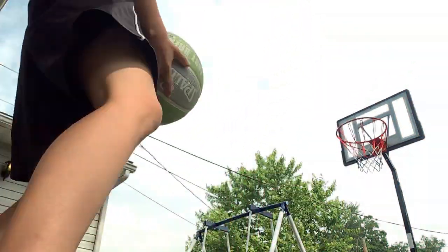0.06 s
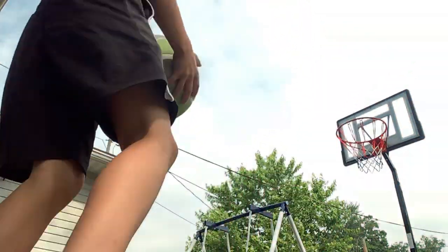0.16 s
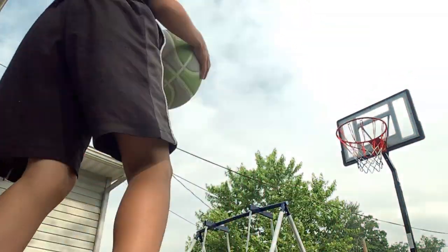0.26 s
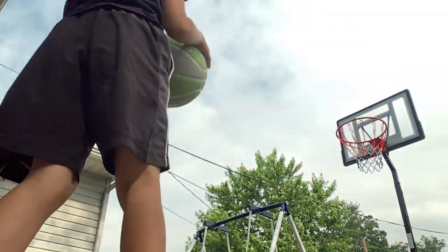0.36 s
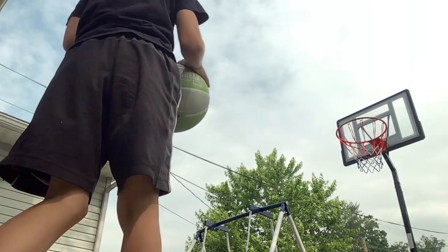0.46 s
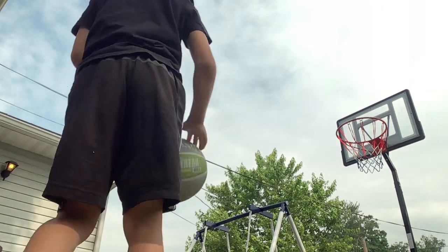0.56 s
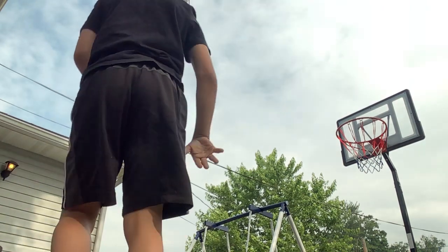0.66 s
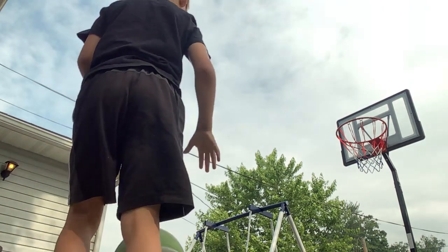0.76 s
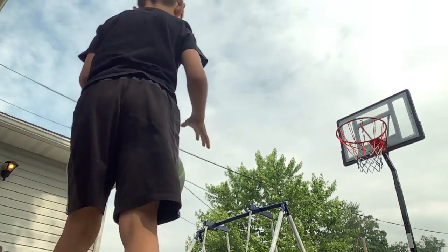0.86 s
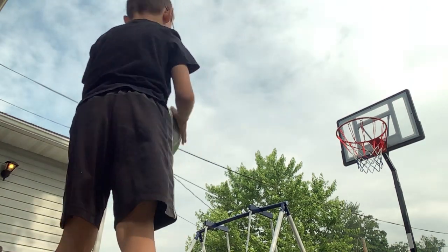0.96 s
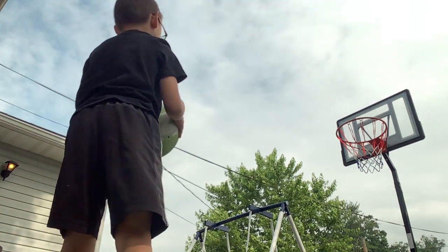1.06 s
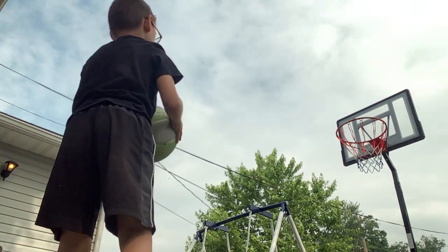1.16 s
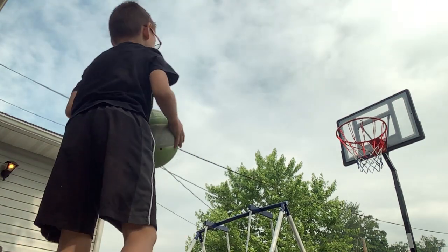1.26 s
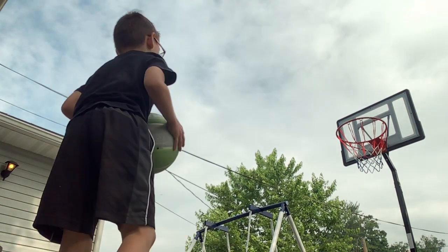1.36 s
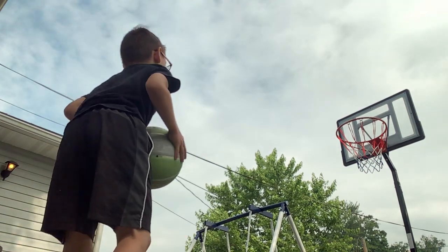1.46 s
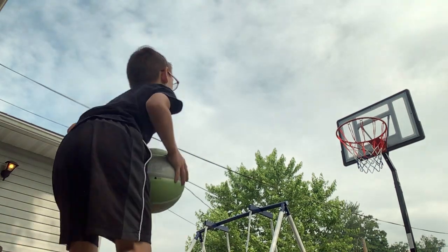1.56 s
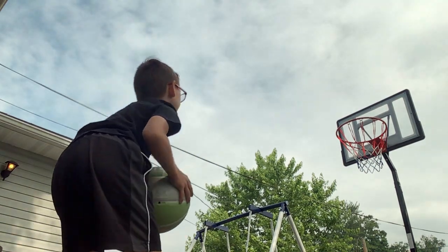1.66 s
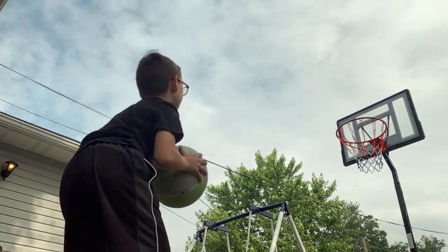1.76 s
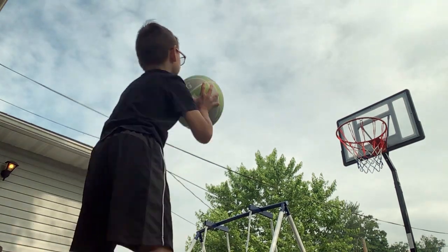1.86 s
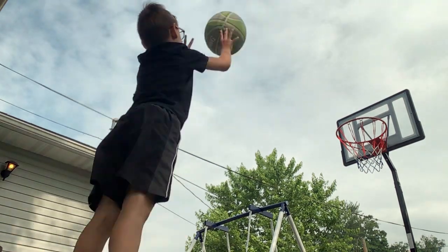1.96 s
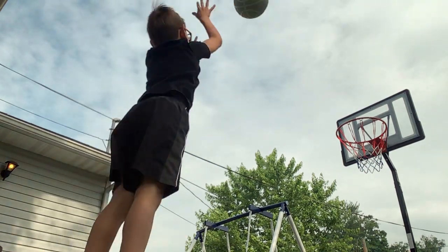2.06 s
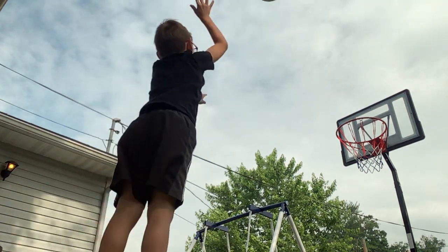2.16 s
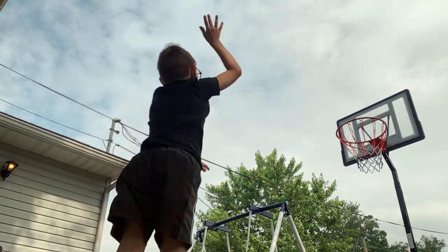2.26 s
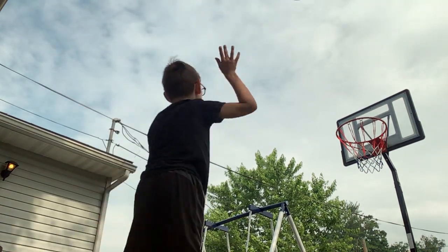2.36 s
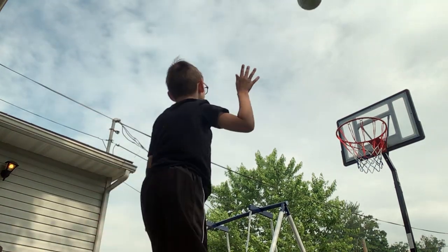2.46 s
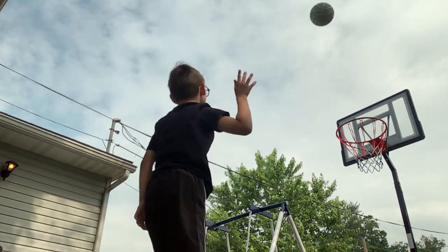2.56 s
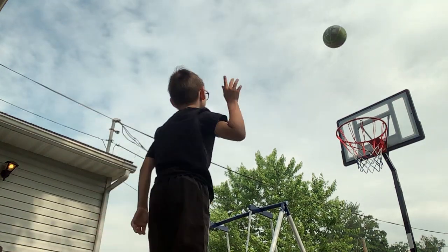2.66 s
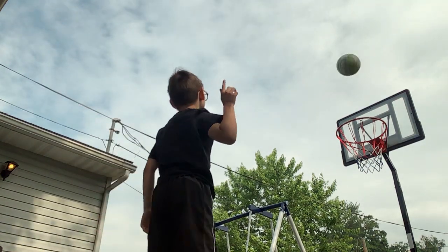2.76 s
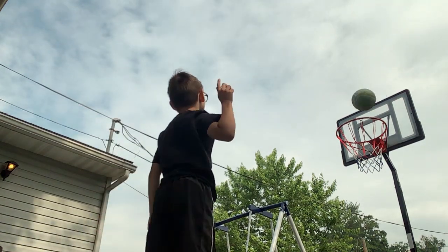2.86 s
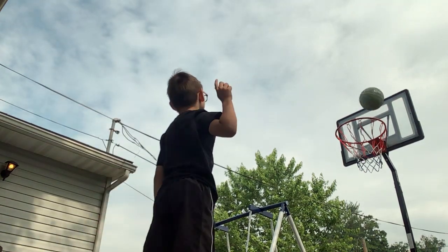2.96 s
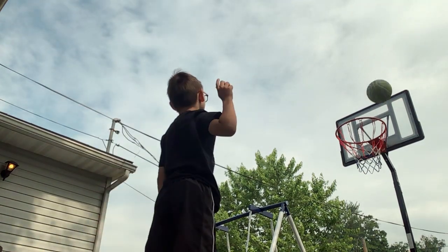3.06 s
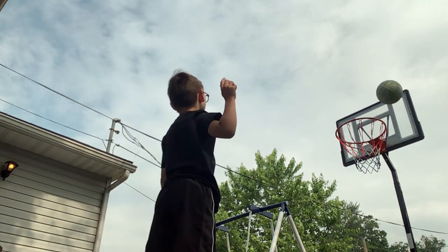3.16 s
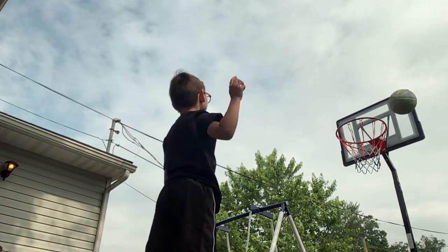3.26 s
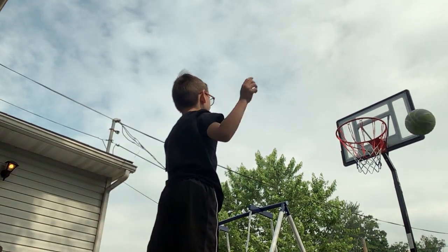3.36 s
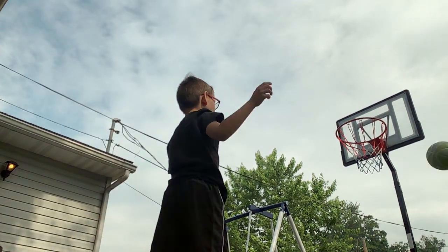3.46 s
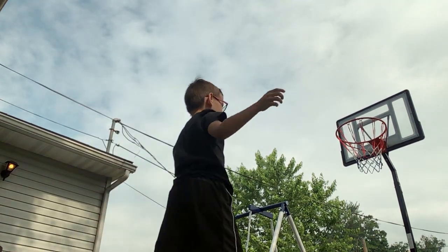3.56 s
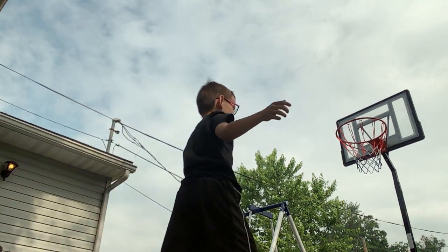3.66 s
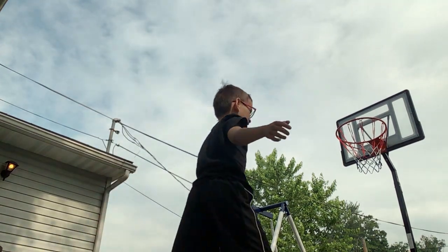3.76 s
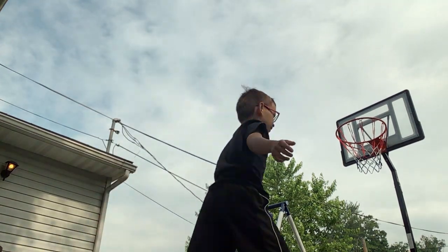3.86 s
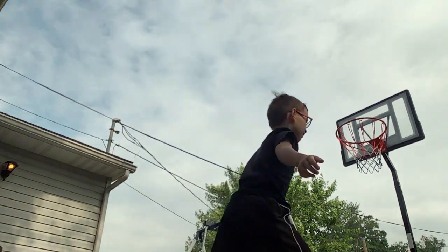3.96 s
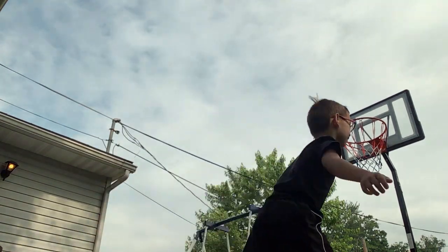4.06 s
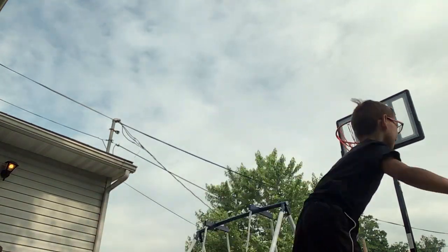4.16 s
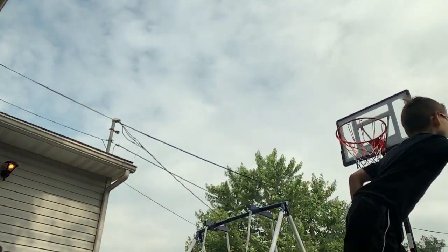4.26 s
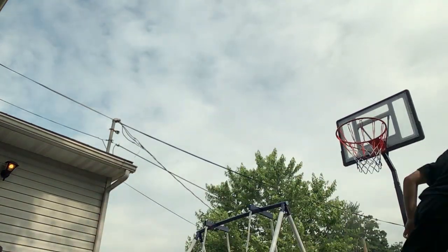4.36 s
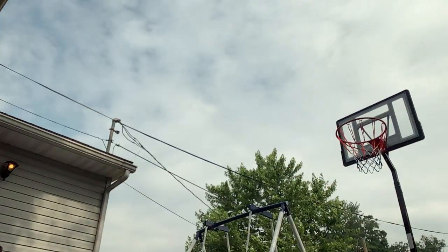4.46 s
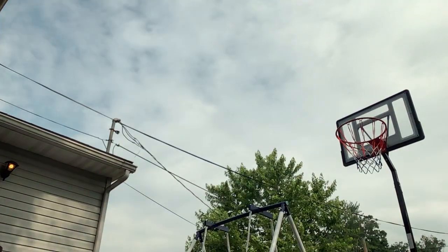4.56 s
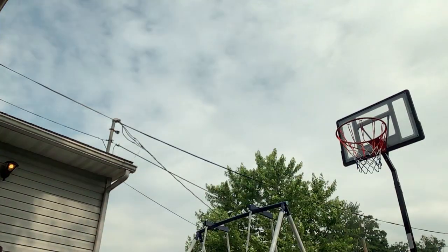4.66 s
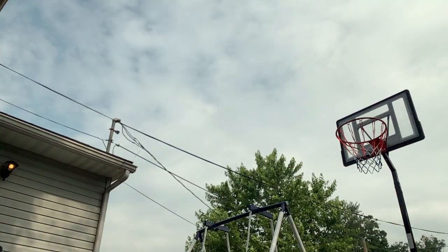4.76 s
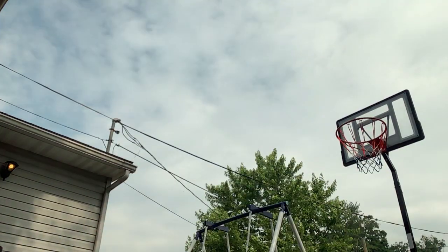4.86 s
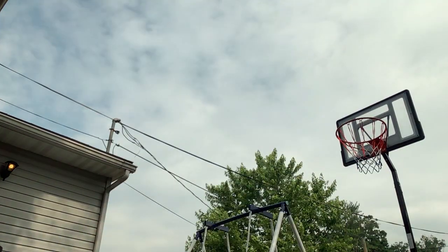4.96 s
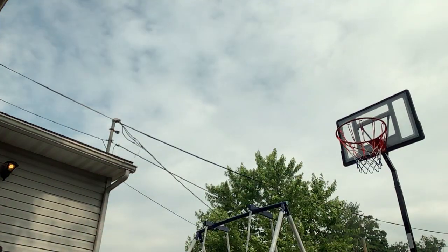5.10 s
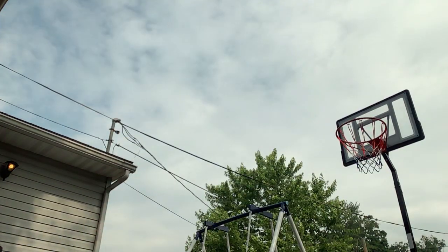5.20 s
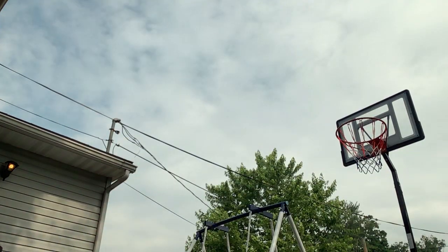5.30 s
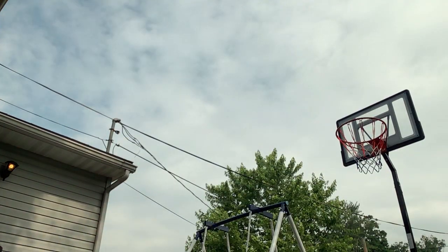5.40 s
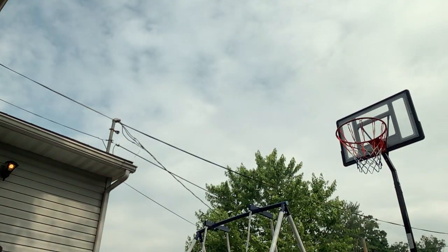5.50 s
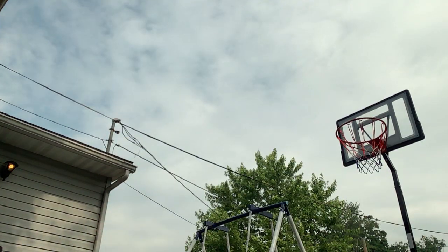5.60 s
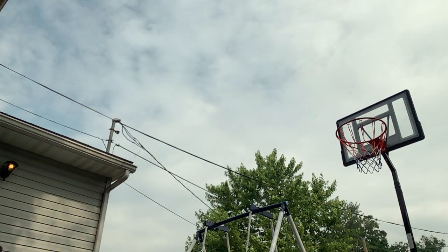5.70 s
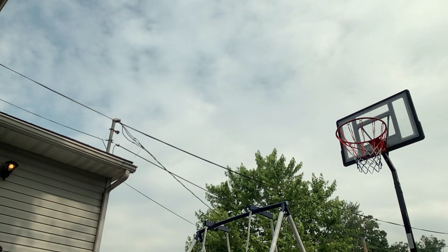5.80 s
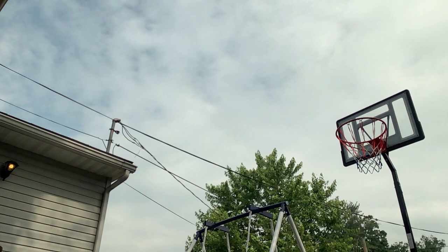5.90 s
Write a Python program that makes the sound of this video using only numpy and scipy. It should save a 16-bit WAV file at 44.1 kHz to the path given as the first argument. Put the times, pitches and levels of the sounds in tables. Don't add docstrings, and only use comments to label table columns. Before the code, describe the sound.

Outdoors, a ball is slapped and bounced with a hollow ring, clatters off a hoop's panel, and thumps away amid soft footsteps.

```python
import sys
import numpy as np
from scipy import signal
from scipy.fft import rfft, irfft
from scipy.io import wavfile
from scipy.ndimage import uniform_filter1d

SR = 44100
rng = np.random.default_rng(int(sys.argv[2]) if len(sys.argv) > 2 else 0)


def output_pcm(signal):
    pcm = np.clip(np.atleast_2d(signal).T, -1, 1) * 32767
    wavfile.write(sys.argv[1], SR, np.round(pcm).astype(np.int16))


def invert_db(x):
    u = np.asarray(x, float) / 20
    return 10 ** u


N = 261760
PAD = 2 ** 18
TIME, FREQ = np.arange(N) / SR, np.fft.rfftfreq(PAD, 1 / SR) + 1e-9
OCTAVE = np.log2(FREQ)


def unit(x):
    return x / np.sqrt(np.mean(x ** 2))


def shaped(x, gain):
    return irfft(rfft(x, PAD) * gain, PAD)[:N]


def band(hz, octaves):
    return np.exp(-2 * ((OCTAVE - np.log2(hz)) / octaves) ** 2)


def colour(points):
    hz, db = np.transpose(points)
    return invert_db(np.interp(np.log(FREQ), np.log(hz), db))


def walk(rate_hz):
    k = int(SR / rate_hz)
    held = np.repeat(rng.standard_normal(N // k + 1), k)
    slewed = uniform_filter1d(uniform_filter1d(held, k), k)
    return unit(slewed[:N])


def grainy(noise, depth_db, grain):
    jumps = np.repeat(rng.standard_normal(N // grain + 1), grain)[:N]
    return noise * invert_db(depth_db * jumps)


def swell(s, rise_ms, fall_ms, at=slice(None)):
    ms = (TIME[at] - s) * 1000
    exponent = np.where(ms < 0, -2 * (ms / rise_ms) ** 2, -ms / fall_ms)
    return np.exp(np.maximum(exponent, -40))


def bursts(noise, table, octaves, rise_ms=0, rise_share=0):
    out, size = np.zeros(N), PAD // 8
    for s, db, hz, fall_ms in table:
        start = int(np.clip(s * SR - size / 5, 0, N - size))
        at = slice(start, start + size)
        puff = unit(irfft(rfft(noise[at]) * band(hz, octaves)[::8], size))
        out[at] += invert_db(db) * puff * swell(s, rise_ms + rise_share * fall_ms, fall_ms, at)
    return out


def ring(x, hz, t60):
    pole = np.exp((2j * np.pi * hz - np.log(1000) / t60) / SR)
    return signal.lfilter([1], [1, -pole], x + 1e-18).imag


def thud(s, db, contact_ms, soft_ms):
    w, length = 2 * np.pi * FREQ, contact_ms / 1000
    squash = np.cos(w * length / 2) / (1 - (w * length / np.pi) ** 2 + 1e-9)
    centred = np.exp(-1j * w * (s + length / 2))
    softening = (1 + (w * soft_ms / 1000) ** 2) ** 1.57
    sound = irfft(-w ** 2 * squash * centred / softening, PAD)[:N]
    return invert_db(db) * sound / np.abs(sound).max()


def late(x, ms):
    return np.roll(x, int(ms * SR / 1000))


# t/s, push level/dB, contact/ms, softness/ms
BOUNCES = [
    (.7197, -10, 4.5, 1.8),
    (3.7669, -9.3, 6.5, 1.3),
    (4.7996, -16.3, 8, 1),
]
# delay/ms, level/dB
WALL_ECHOES = [
    [(26.4, -13), (36.4, -20), (49, -25), (57.4, -23), (81, -27)],
    [(24.8, -9), (47.8, -11), (74.7, -21), (128, -25)],
    [(19.7, -15), (28.7, -13), (36.5, -19), (53, -17), (92, -22), (101, -19)],
]
# ring level/dB, release over touch/dB, skin slap level/dB
HOLLOW = [
    (-13.5, 1.5, -11),
    (-29, 3, -26),
    (-41, 4, -29),
]
# f/Hz, level/dB, t60/s
BALL_MODES = [(447, -2, 0.047), (690, -25, 0.026), (900, -15, 0.049), (1014, -6.5, 0.082),
              (1168, 6.5, 0.032), (1366, 0, 0.03), (1650, -8, 0.034), (2050, -1, .03), (3000, -9, .03),
              (3950, -29, .03)]
YARD_T60_S, YARD_HZ, YARD_DB = 0.38, 500, -29.5


def ball():
    out = 0
    for (s, db, contact_ms, soft_ms), (ring_db, release_db, slap_db), echoes in zip(
            BOUNCES, HOLLOW, WALL_ECHOES):
        touch, release = s - soft_ms / 1000, s + (contact_ms + soft_ms) / 1000
        touch_kick = np.exp(-((TIME - touch) / 0.00015) ** 2)
        release_kick = np.exp(-((TIME - release + .001) / 0.00022) ** 2)
        kicks = touch_kick + invert_db(release_db) * release_kick
        hollow = sum(invert_db(mode_db) * ring(kicks, hz, t60) for hz, mode_db, t60 in BALL_MODES)
        hollow = invert_db(ring_db) * hollow / np.abs(hollow).max()
        skin = thud(touch - .0007, slap_db, contact_ms + 2 * soft_ms, 0.47)
        push = thud(s, db, contact_ms, soft_ms) + skin
        walls = sum(invert_db(echo_db) * late(push + 0.15 * hollow, ms) for ms, echo_db in echoes)
        yard_gain = band(100, 0.93) + invert_db(-24) * band(YARD_HZ, 2.45)
        diffuse = unit(shaped(rng.standard_normal(N), yard_gain))
        tail = diffuse * swell(s + 0.025, 45, 1000 * YARD_T60_S / np.log(1000))
        out = out + push + hollow + walls + invert_db(db + YARD_DB) * tail
    return out


# t/s, level/dB, contact/ms, softness/ms
ROCKING = [(2.9485, -20.5, 9, .5), (2.9585, -26, 3.5, .5), (2.9770, -23, 4.5, .7), (2.9866, -23, 5.5, 2),
           (2.9947, -19, 6, 1), (2.9999, -22, 12, 2), (3.0212, -18, 5, 1), (3.0277, -25, 6.5, 2),
           (3.0472, -21, 5, 1), (3.0575, -23, 7, 1.5)]
# t/s, level/dB, rattle/ms, tilt/(dB/octave)
BOARD_BLOWS = [
    (2.9268, -40, 21, 4.5),
    (2.9408, -30, 32.7, 5),
    (2.968, -37.5, 57, 2.5),
    (3.043, -38.5, 21, 0.5),
]
# f/Hz, width/Hz, level/dB
BOARD_MODES = [(750, 26, -25), (1245, 19, -1), (1553, 47, -5.5), (1570, 22, -2), (2200, 55, -27),
               (2670, 45, -8), (3000, 71, -7.5), (3940, 40, -21), (4600, 39, -22), (5400, 32, -27)]
# f/Hz, level/(dB per Hz)
RATTLE = [(150, 24.5), (250, 5), (528, 4), (802, 3.5), (1310, -13.5), (1530, -4), (2620, -15),
          (3280, -16.5), (16000, -45.5)]
# t/s, level/dB, centre f/Hz, fall/ms
CRACKS = [(2.9425, -36, 2900, 4.6), (2.9467, -31, 1750, 3), (2.947, -31, 820, 10), (2.955, -31, 1590, 3.8),
          (2.972, -50, 2400, 6), (3.047, -55, 7300, 4.4), (3.05, -48, 2300, 5)]
# t/s, level/dB, centre f/Hz, fall/ms
RUMBLES = [
    (3.02, -34, 95, 130),
    (3.06, -57, 2500, 96),
    (3.12, -59.5, 510, 190),
]
# t/s, level/dB, f/Hz, fall/ms
BUZZES = [
    (2.945, -61, 11000, 45),
    (2.97, -58, 5200, 59.7),
    (3.05, -59, 2110, 21),
]
BOARD_RING_DB, BLOW_DB = -2, 3.5


def backboard():
    chatter = grainy(rng.standard_normal(N), 3, 60)
    out = sum(thud(*row) for row in ROCKING)
    for s, db, rattle_ms, tilt_db in BOARD_BLOWS:
        shake = shaped(chatter, invert_db(tilt_db * np.log2(FREQ / 2000 + 0.051)))
        broad = unit(shaped(shake, colour(RATTLE)))
        drive = shake * swell(s, 1.0, rattle_ms / 3)
        panel = 0
        for hz, width_hz, mode_db in BOARD_MODES:
            t60 = np.log(1000) / (np.pi * width_hz)
            panel = panel + invert_db(mode_db) * width_hz / 60 * ring(drive, hz, t60)
        blow = broad * swell(s, 0.21, rattle_ms) + invert_db(BOARD_RING_DB - 24.5) * panel
        out = out + invert_db(db + BLOW_DB) * blow
    out = out + bursts(chatter, CRACKS, 0.47, rise_ms=0.64)
    air = rng.standard_normal(N)
    return out + bursts(air, RUMBLES, 1.39, rise_ms=45) + bursts(air, BUZZES, 0.049, rise_ms=3)


# t/s, push level/dB, contact/ms, softness/ms
STEPS = [(.3570, -42, 6, 1.1), (1.0060, -43, 2, .4), (2.2714, -36, 3, .5), (4.3940, -40, 6, 1.1),
         (4.6977, -31, 4.5, .5), (5.0111, -41, 8, 1), (5.0274, -39, 5.5, .5), (5.3584, -20.7, 3, .7)]
# delay/ms, level/dB
STEP_ECHO = (33, -12)


def feet():
    steps = sum(thud(*row) for row in STEPS)
    delay_ms, echo_db = STEP_ECHO
    return steps + invert_db(echo_db) * late(steps, delay_ms)


# f/Hz, level/dB
SOLE_MODES = [(1550, -4), (2950, 2), (4000, -0.5), (5300, -2.5), (7700, -5), (11000, -23.5)]
# t/s, level/dB, centre f/Hz, fall/ms
TICKS = [(0.019, -55, 6000, 2.2), (.352, -75, 9000, 2.7), (.452, -51, 5000, 1.3), (.4575, -56, 3800, 1.3),
         (.466, -62, 9000, 2), (.463, -57, 2200, 2.5), (0.477, -63, 9000, 3), (.5082, -38, 6000, 1.3),
         (.5082, -44, 14000, 1.5), (.5088, -26, 1800, 1.3), (.5122, -42, 3500, 2.5), (.5272, -42, 2600, 2),
         (.544, -61, 5500, 4), (.7155, -59, 7500, 2.3), (.716, -54, 14000, 2.6), (0.7153, -39.5, 2820, 2.7),
         (.983, -69, 6500, 3), (1.002, -67, 3000, 14), (1.108, -74, 5500, 2.7), (2.268, -66, 4000, 6),
         (2.577, -66, 1990, 3.3), (2.888, -65, 6500, 6.1), (3.19, -74, 6860, 6), (3.285, -71, 6000, 6),
         (4.282, -64.5, 6870, 3.1), (4.319, -68, 7400, 5.3), (4.596, -66, 6500, 6), (5.238, -67, 3300, 5),
         (5.249, -73, 7000, 3)]
# t/s, level/dB, centre f/Hz, fall/ms
SCRAPES = [(0.026, -58, 4460, 13), (.494, -51, 5700, 11), (.512, -46, 260, 20), (0.536, -63, 5430, 25),
           (.73, -63, 3980, 27), (2.284, -45.5, 1510, 19), (2.288, -74, 7950, 12), (2.305, -55.5, 7000, 6),
           (2.335, -66.5, 8000, 16), (2.362, -74, 7500, 8.6), (2.585, -48, 1600, 10.4),
           (2.587, -61.5, 4900, 10), (2.292, -52, 3600, 12), (4.365, -73.5, 9000, 40)]
# t/s, level/dB, centre f/Hz, fall/ms
KNOCKS = [(1.006, -49, 517, 14), (2.276, -43, 450, 7.7), (3.7657, -27, 750, 4.1), (3.774, -35, 756, 10),
          (3.77, -54, 1900, 8), (.5095, -37, 1400, 2.5), (.511, -44, 650, 5), (4.697, -47.5, 510, 8.9),
          (4.7992, -35, 750, 1.9), (4.809, -35, 470, 9), (5.03, -42, 500, 4.6), (5.359, -57, 590, 4.3),
          (5.699, -53.5, 890, 4.1)]
# t/s, level/dB, centre f/Hz, fall/ms
RUSTLES = [(1.945, -65, 3470, 18), (2.355, -65, 4600, 24), (2.615, -69.5, 5000, 25),
           (4.3, -69.5, 3340, 140), (4.6, -64, 3900, 49), (4.715, -63, 3800, 43), (4.76, -66, 3800, 14)]
# t/s, level/dB
DUST = [(.004, -65), (1.95, -72), (3.77, -80), (4.01, -77.5), (4.69, -77), (4.795, -72), (5.03, -75.5),
        (5.36, -79), (5.645, -80)]
DUST_HZ, DUST_FALL_MS = 9500, 14
# multiple of f, level/dB
SQUEAK = [(1.08, -47), (2, -44), (3, -51), (4.8, -62.5)]
SQUEAK_S, SQUEAK_HZ, SQUEAK_FALL_MS = 2.288, 1417, 3.4


def grit():
    noise = rng.standard_normal(N)
    resonance = 1 + sum(invert_db(db) * band(hz, 0.12) for hz, db in SOLE_MODES)
    snap = shaped(noise, resonance)
    grains = shaped(grainy(noise, 3.2, 40), resonance)
    dust = [(s, db, DUST_HZ, DUST_FALL_MS) for s, db in DUST]
    squeak = [(SQUEAK_S, db, k * SQUEAK_HZ, SQUEAK_FALL_MS) for k, db in SQUEAK]
    out = bursts(snap, TICKS, 1.6, rise_ms=.8)
    out += bursts(snap, squeak, .14, rise_ms=12.6)
    out += bursts(grains, SCRAPES, 2.04, rise_share=0.87)
    out += bursts(grains, KNOCKS, 0.54, rise_ms=2.05)
    out += bursts(grains, RUSTLES, 1.05, rise_share=.3)
    out += bursts(grains, dust, 2.1, rise_ms=6)
    return out


# t/s, f/Hz, level/dB
CHIRPS = [(.07, 5200, -74), (1.235, 5300, -81), (1.5, 5500, -76), (1.52, 4700, -79), (1.61, 4800, -75.5),
          (1.94, 5260, -74), (1.96, 4630, -75), (2.12, 5700, -74), (2.135, 4660, -73.5), (3.5, 5150, -80),
          (3.9, 4500, -78), (4.25, 5060, -78), (4.49, 5550, -78)]
# t/s, f/Hz, level/dB
WHISTLES = [(1.53, 3950, -82), (2.045, 3450, -81), (2.205, 4500, -76), (2.205, 4030, -74),
            (2.44, 5270, -91), (2.66, 4060, -75), (3.28, 3860, -75), (3.35, 3840, -81), (3.42, 3920, -80),
            (3.51, 5530, -87), (3.64, 3880, -69), (4.22, 3090, -69), (4.61, 2800, -72)]
# t/s, lowest voice f/Hz, level/dB
SCOLDS = [(4.595, 4250, -75), (4.705, 3600, -66.5)]
# ratio of f, level/dB
SCOLD_VOICES = [(1, 1), (1.28, -4), (1.6, -3)]
# length/s, droop/share of f, smear/Hz
CHIRP = (.07, .04, 220)
# length/s, droop/share of f, smear/Hz
WHISTLE = (.055, .002, 50)
# length/s, droop/share of f, smear/Hz
SCOLD = (.065, .15, 310)


def birds():
    out, flutter = np.zeros(N), walk(900)
    scolds = [(s, hz * ratio, db + voice_db) for s, hz, db in SCOLDS for ratio, voice_db in SCOLD_VOICES]
    for calls, shape in ((CHIRPS, CHIRP), (WHISTLES, WHISTLE), (scolds, SCOLD)):
        length_s, droop, smear_hz = shape
        part = np.linspace(0, 1, int(length_s * SR))
        envelope = np.sqrt(2 * np.abs(np.sin(np.pi * part)))
        for s, start_hz, db in calls:
            at = slice(int(s * SR), int(s * SR) + len(part))
            hz = start_hz * (1 - droop * part) + smear_hz * flutter[at]
            out[at] += invert_db(db) * envelope * np.sin(2 * np.pi * np.cumsum(hz) / SR)
    return out


# multiple of f, level/dB
MOTOR = [(0.999, -75), (2, -56.5), (3, -64), (4.4, -69.5), (6, -72)]
MOTOR_HZ, MOTOR_WANDER = 63.2, 0.02018


def motor():
    turn = 2 * np.pi * np.cumsum(MOTOR_HZ * (1 + MOTOR_WANDER * walk(10))) / SR
    return sum(invert_db(db + 2.07 * walk(13)) * np.sqrt(2) * np.sin(k * turn) for k, db in MOTOR)


# f/Hz, level/(dB per Hz)
TOWN = [(18, -51), (50, -7), (127, -3), (170, -7), (273, -8.5), (415, -13.5), (632, -13), (801, -19),
        (1190, -20), (1540, -26.5), (2350, -22.5), (3400, -31), (4530, -42.5), (6050, -50), (13700, -53.5),
        (16000, -70)]
TOWN_DB, SWELL_DB, FLICKER_DB = -53, .6, 1.5


def town():
    slow, noise = walk(1.0), shaped(rng.standard_normal(N), colour(TOWN))
    out = 0
    for hz in 30 * 2 ** np.arange(0, 9.6, .5):
        level = invert_db(SWELL_DB * slow + FLICKER_DB * walk(8))
        out = out + level * shaped(noise, band(hz, 0.39))
    return invert_db(TOWN_DB) * unit(out)


BASS_CUT_HZ, HUM_CUT_HZ = 90, 46


def scene():
    hits = ball() + backboard() + feet() + grit()
    hits = shaped(hits, 1 / np.sqrt(1 + (BASS_CUT_HZ / FREQ) ** 8))
    hum = shaped(motor() + town(), 1 / np.sqrt(1 + (HUM_CUT_HZ / FREQ) ** 22))
    return (hits + birds() + hum)[None]


def top_cut(x):
    return signal.sosfilt(signal.butter(12, 16800, fs=SR, output="sos"), x)


LAG_HZ, LAG_STAGES = 100, 8


def record(dry):
    phase = -2 * LAG_STAGES * (np.arctan(FREQ / LAG_HZ) - np.pi / 2)
    lagged = shaped(dry[0], np.exp(1j * phase))
    return top_cut(lagged[None])


dry = scene()
out = record(dry)
output_pcm(out)
```